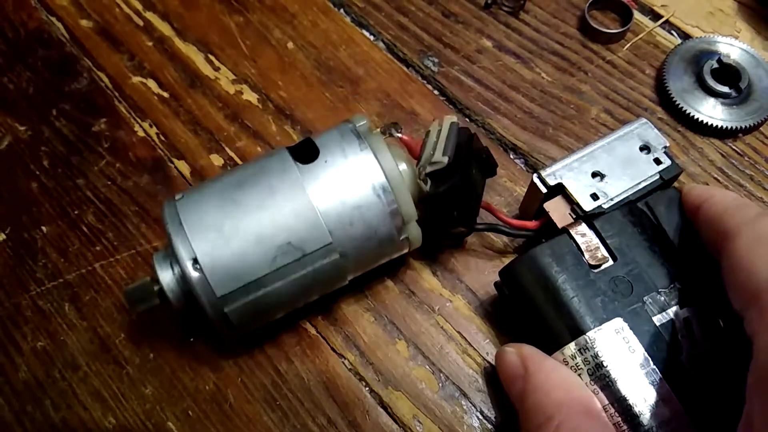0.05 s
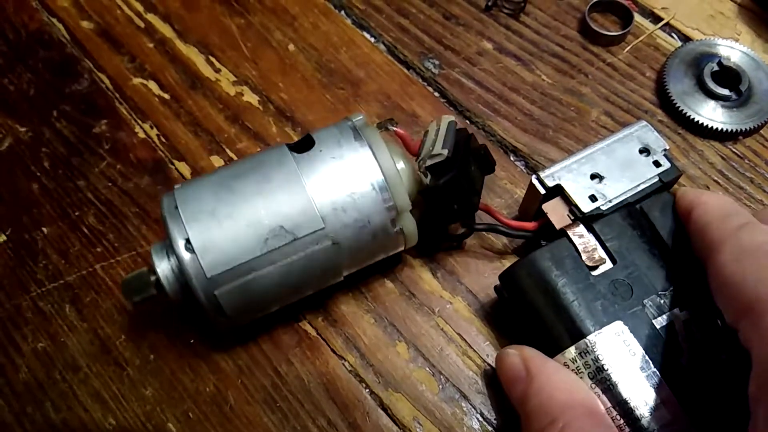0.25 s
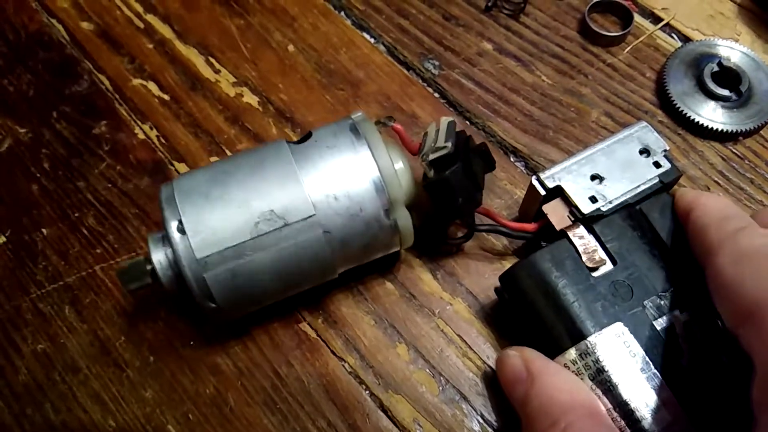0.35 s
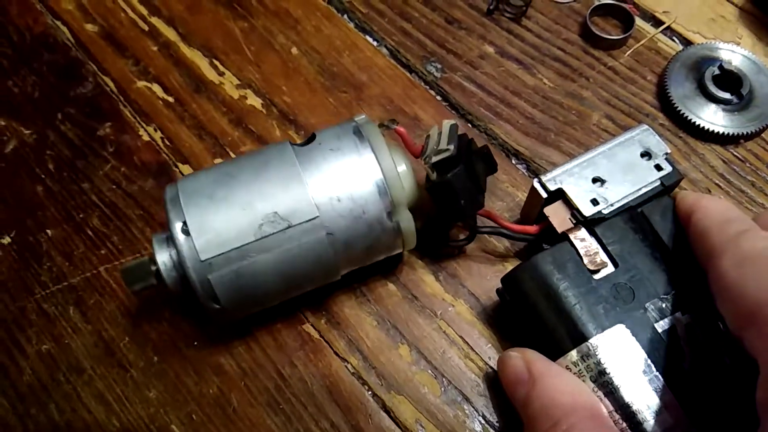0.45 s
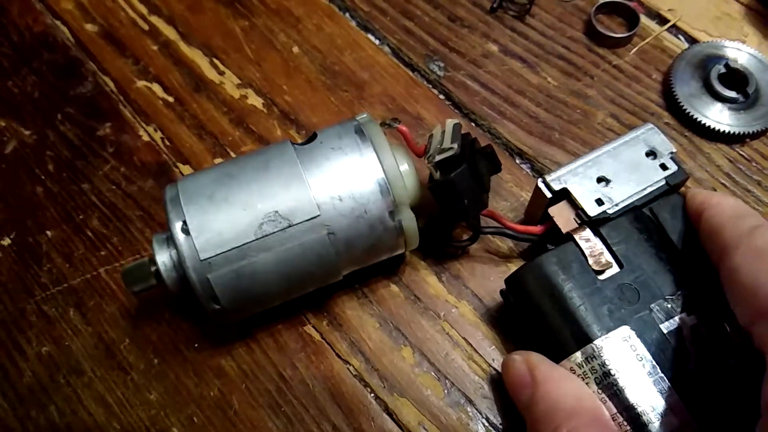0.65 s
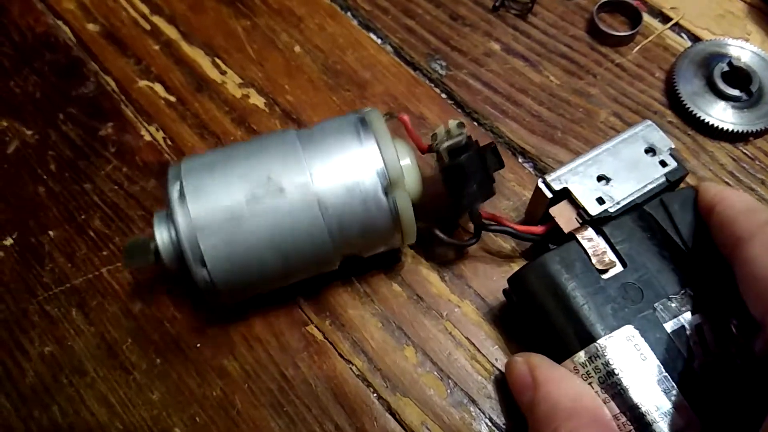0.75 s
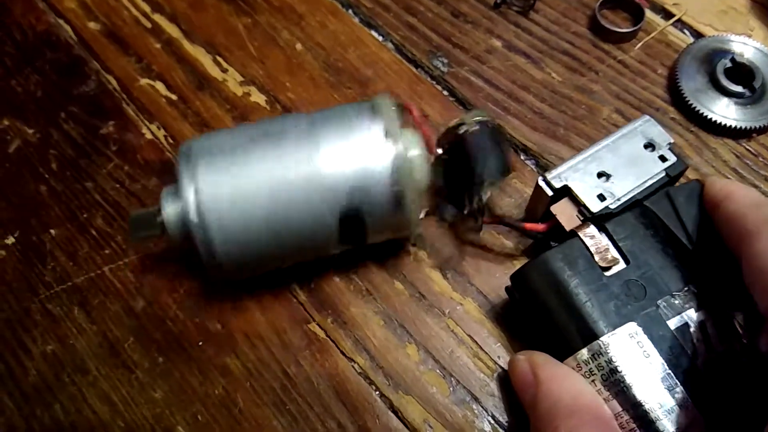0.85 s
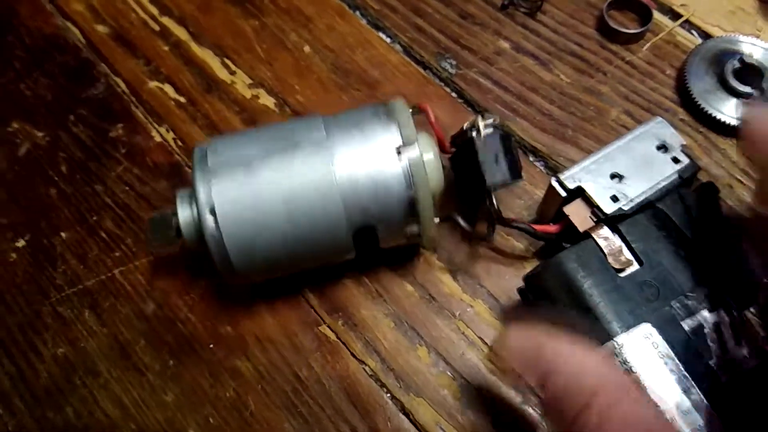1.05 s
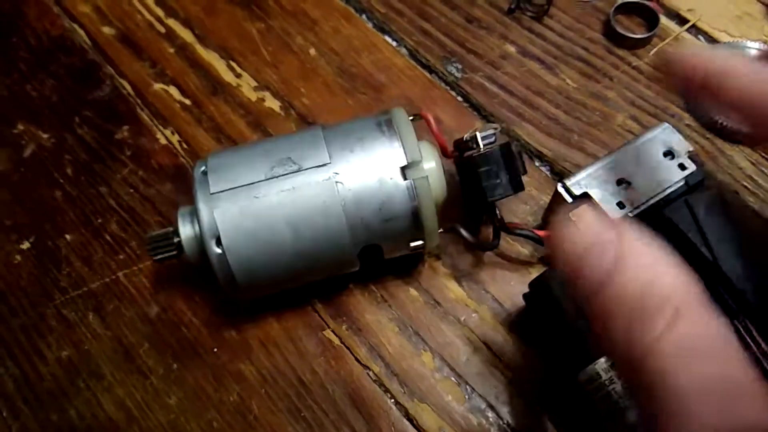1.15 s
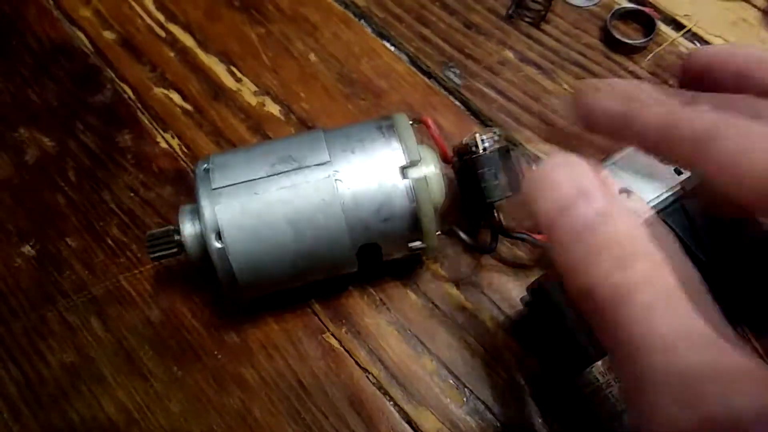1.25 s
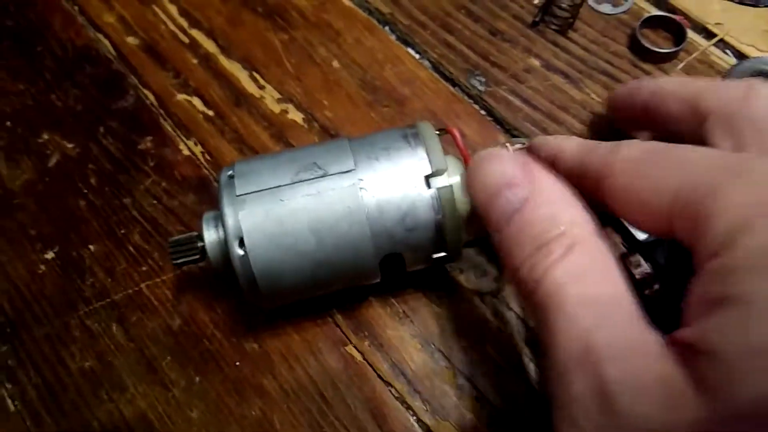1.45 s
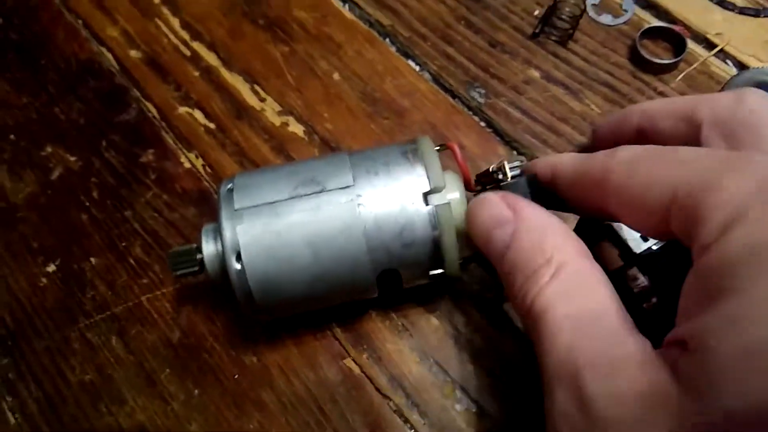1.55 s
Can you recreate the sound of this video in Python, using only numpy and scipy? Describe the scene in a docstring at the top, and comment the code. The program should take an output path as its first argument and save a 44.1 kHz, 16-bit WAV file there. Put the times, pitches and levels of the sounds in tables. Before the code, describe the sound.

A small bare electric motor whirs up, runs harshly for a moment, then brakes with wooden knocks

```python
"""Small room, close stereo microphone: a bare drill motor lies on a wooden workbench.
It speeds up as its trigger is squeezed with a metallic click, then is let go and brakes. Its unbalanced rotor
hums through the bench and its brushes scratch the same track on every turn, ringing the steel can; armature
slots add a whine. The shaft rasps in its bearing while speeding up and slowing. Decaying bench modes and can
noise make the knocks as the motor rocks on starting and stopping; a hand then shifts the switch.
Steady room noise lies behind."""
import sys
import numpy as np
from scipy import signal
from scipy.fft import rfft, irfft
from scipy.io import wavfile

SR = 44100
rng = np.random.default_rng(int(sys.argv[2]) if len(sys.argv) > 2 else 0)


def to_wav(s):
    """Save 16-bit WAV."""
    ch = np.atleast_2d(s).T  # columns
    pcm = np.round(np.clip(ch, -1, 1) * 32767)  # PCM
    wavfile.write(sys.argv[1], SR, pcm.astype(np.int16))


N = 70560  # length [samples]
T = np.arange(N) / SR  # time [s]

# shaft speed: (time [s], speed [turns per second])
SHAFT_SPEED = [(0, 58), (.1, 78.5), (.255, 96.5), (.306, 110), (.346, 122.5), (.392, 128), (.442, 132.5),
               (.496, 137), (.602, 143.5), (.705, 146.5), (.738, 143.5), (.766, 136), (.808, 123.5),
               (.842, 112.5), (.896, 97.5), (.93, 73.6), (1.0, 2.14)]
# hum at the reference speed, before the bench radiates it: (multiple of shaft rate, level [dB])
HUM_ORDERS = [(1, -30), (2, -44.5), (3, -43.5), (4, -52.5), (5, -58), (6, -51), (7, -56), (8, -56.5),
              (10, -59), (12, -56)]
# how well the bench radiates the hum: (frequency [Hz], gain [dB])
BENCH_RADIATION = [(105, -23.5), (145, -3), (200, -8.5), (255, -2.5), (290, 1.5), (380, -10.5), (500, -3.5),
                   (1000, -3), (1070, -13), (1160, 2.5), (1450, -3)]
# whine of the armature slots: (time [s], level [dB])
SLOT_WHINE = [(.25, -66.5), (.35, -44), (.42, -43), (.455, -55.5), (.6, -48), (.8, -46), (.92, -44),
              (1, -94)]
# strength of the brush scratch: (time [s], level [dB])
SCRATCH_LEVEL = [(0, -65.5), (.07, -60), (.09, -51.5), (.21, -38.5), (.32, -35), (.48, -34.5), (.6, -35.5),
                 (.9, -35), (.925, -56.5), (1.06, -82.5)]
# share of the scratch that repeats each turn: (frequency [Hz], level [dB])
REPEATING_SCRATCH = [(1200, -8), (3000, -3), (6000, 3), (14000, 0)]
# fresh friction noise at the brushes: (frequency [Hz], level [dB])
FRESH_FRICTION = [(1200, -1), (3000, -12), (7000, -10), (11000, -4)]
# commutator tones against the scratch: (multiple of shaft rate, level [dB], extra at chatter speed [dB])
COMMUTATOR_TONES = [(21, -22, -10), (22, -19, -5), (24, -18, 8), (25, -19, -2), (27, -21, 6), (30, -17, 8)]
# spectrum of the ringing steel can: (frequency [Hz], left level [dB], right level [dB])
CAN_RESPONSE = [(64, -60, -30), (133, 10, 9), (239, 5.5, -9), (546, -6, -7.5), (1240, -6, -5.5),
                (1480, -10.5, -8), (2520, -9.5, -12.5), (3210, 0.5, -0.5), (3710, 0.5, 1.5),
                (4430, -4, -5.5), (5340, -6.5, -9), (5930, -7.5, -5.5), (6480, -10, -6.5),
                (7180, -17.5, -20.5), (8220, -5, -13), (9160, -17, -21), (10900, -9, -12),
                (11940, -4, -5.5), (12560, -9, -9), (15100, -13, -12.5)]
# likeness of the can's sound at left and right: (frequency [Hz], correlation [-1 to 1])
CAN_LIKENESS = [(200, -0.91), (1200, 1), (2100, -0.85), (3100, 0.9), (3700, 0.63), (4700, -0.77),
                (5600, 0.19), (6500, -0.69), (7700, 0.17)]
# once-a-turn rasp of the shaft, strong while speeding up, fading at full speed, back while slowing:
# (time [s], level [dB])
RASP_LEVEL = [(.06, -66), (.22, -45), (.36, -44), (.45, -56), (.74, -58), (.82, -49), (.9, -50), (1.0, -85)]
# knocks on the bench, and a metallic trigger click at .083 s:
# (time [s], level [dB], contact hardness [Hz], metal rattle [dB], pitch of the bench's ring [ratio])
BENCH_KNOCKS_AND_CLICK = [(.023, -47.5, 740, 3.5, 0.86), (.083, -57.5, 1510, 19, 1.36),
                          (.223, -32, 900, -18, 0.84), (.231, -32, 790, -5, .8),
                          (.252, -32.5, 800, -2, 0.91), (.8, -35, 300, -10, 0.72),
                          (.854, -34, 500, 6, 0.93), (.893, -32, 2600, 11, 1.17),
                          (0.9164, -26, 740, -13, 1), (.922, -27, 456, -11, 1.016),
                          (0.9293, -14.5, 465, -20.5, 1), (.958, -35, 395, -1, 1),
                          (.996, -23.5, 800, -40, 1.05), (1.0193, -33.5, 595, -20, 1.02),
                          (1.089, -50, 960, -7, 0.89), (1.17, -40, 520, -10.5, 0.99),
                          (1.179, -43, 495, -21, 0.97), (1.197, -40.5, 645, -22, 1),
                          (1.205, -59, 900, 5, 0.95), (1.518, -56, 400, -27, 0.66)]
# bench modes before each knock's pitch ratio: (frequency [Hz], level [dB], T60 [s])
BENCH_MODES = [(197.8, -8.5, 0.11), (245.7, 3.5, 0.059), (338, -9, 0.084), (498, -14, 0.072),
               (611, -9.5, 0.055), (950, -12.5, 0.033), (1183, -11, 0.068), (1550, -6, 0.017)]
# dense wood resonances behind the modes: (frequency [Hz], level [dB])
WOOD_SPECTRUM = [(170, -21), (700, -7), (1500, -9.5), (2100, -15.5), (4000, -30)]
# relative spectrum of the quiet background: (frequency [Hz], density [dB per Hz])
FLOOR_SPECTRUM = [(30, 4), (150, 6.5), (1300, -4.5), (2200, -18.5), (3400, -14), (4800, -29.5),
                  (15000, -32)]

REFERENCE_HZ = 145  # shaft rate at which the hum and tones take their table levels
HUM_DB_PER_OCTAVE = 13.5  # rise with shaft speed
HUM_PAN_DB = 13  # at the shaft rate; divided by the order above it
HUM_WAVER, WHINE_WAVER, TONE_WAVER = 0.1, 0.049, .4  # relative; hum also times the root of its order
CHATTER_HZ, CHATTER_WIDTH_HZ = 135, 6  # shaft rate where the brushes chatter

JITTER_S, WEAR = 7e-6, .22  # chance in each bump's time, and in its relative height each turn
BAR_DEPTH = .55  # swing of brush pressure
SLOW_NOISE_DB = 14  # loss of the repeating clicks at half speed and below
CRACKLE_DB, CRACKLE_HZ = 6, 220  # crackle swing at half speed and below, and its rate limit
CAN_T60, CAN_RING_DB = .025, -7  # [s], ring energy against the direct sound

RASP_HZ, RASP_WIDTH_HZ, RASP_PAN_DB = 3430, 530, 4.5
RASP_SHARE, RASP_WANDER = .17, .05  # width and wander of the scrape [turns]
RASP_SCATTER_DB = 1.2

CONTACT_S, BENCH_DETUNE = .0007, .025  # onset of a blow, relative chance in each mode's pitch
BENCH_LOW_HZ, BENCH_PAN_DB = 165, 6
WOOD_DB, WOOD_T60 = -5.5, 0.052  # [dB], [s]
METAL_T60, RATTLE_HZ = 0.088, 3230  # decay [s], rattle's upper limit

ROOM_T60, ROOM_DB, ROOM_LOW_HZ = .11, -9, 320  # decay [s], level, bass cut
FLOOR_DB, FLOOR_ALIKE, FLOOR_PAN_DB = -63.5, 0.48, 1.5  # likeness of left and right is a correlation
LOW_CUT_HZ, EDGE_HZ = 98, 15550


def amp(db):
    """Decibels to gain."""
    return 10 ** (np.asarray(db) / 20)


def unit(x):
    """Scales to rms 1."""
    return x / np.sqrt(np.mean(x ** 2) + 1e-20)


def curve(points):
    """A control curve at every sample."""
    return np.interp(T, *np.transpose(points))


def read(points, hz):
    """A table read on a log-frequency axis."""
    f, value = np.transpose(points)
    return np.interp(np.log(hz + 1), np.log(f + 1), value)


def colour(x, points):
    """Filters x by a table of gains over frequency."""
    size = 2 * x.shape[-1]
    gain = amp(read(points, np.fft.rfftfreq(size, 1 / SR)))
    return irfft(rfft(x, size) * gain)[..., :size // 2]


def pan(db):
    """Left and right gains, left db above right, with a mean of 1."""
    gains = amp([[db / 2], [-db / 2]])
    return gains / gains.mean()


def drift(rate_hz):
    """Slow chance, rms 1: noise that fades above rate_hz."""
    fade = 1 + (np.fft.rfftfreq(N, 1 / SR) / rate_hz) ** 4
    return unit(irfft(rfft(rng.standard_normal(N)) / fade, N))


def correlate(a, b, alike):
    """A left and right pair of the given likeness, from two unrelated signals."""
    return np.array([a, alike * a + np.sqrt(1 - alike ** 2) * b])


def butter(hz, kind, order=2):
    """A Butterworth filter in second-order sections."""
    return signal.butter(order, hz, kind, fs=SR, output="sos")


def add(mix, s, sound):
    """Mixes a sound in at time s."""
    part = mix[round(s * SR):][:len(sound)]
    part += sound[:len(part)]


def motor():
    """Hum, whine, scratch and rasp of one motor, all locked to the turning of its shaft."""
    speed = curve(SHAFT_SPEED)
    turns = np.cumsum(speed) / SR
    return hum(speed, turns) + whine(turns) + scratch(speed, turns) + rasp(turns)


def shaft_tone(turns, order, waver):
    """A tone at a multiple of the shaft rate, wavering in strength and phase."""
    carrier = np.exp(2j * np.pi * (order * turns + rng.random()))
    wavering = 1 + waver * (drift(17.0) + 1j * drift(30))
    return np.sqrt(2) * np.real(carrier * wavering)


def hum(speed, turns):
    """The unbalanced rotor shakes the bench, which radiates each order according to its frequency."""
    total = np.zeros((2, N))
    for order, db in HUM_ORDERS:
        level = amp(db + read(BENCH_RADIATION, order * speed))
        tone = shaft_tone(turns, order, HUM_WAVER * np.sqrt(order))
        total += level * tone * pan(HUM_PAN_DB / order)
    return total * amp(HUM_DB_PER_OCTAVE * np.log2(speed / REFERENCE_HZ))


def whine(turns):
    """Nine armature slots pass on each turn and make a tone at nine times the shaft rate."""
    return amp(curve(SLOT_WHINE)) * shaft_tone(turns, 9, WHINE_WAVER)


def scratch(speed, turns):
    """Two brushes and the commutator tones drive the steel can."""
    drives = np.array([brush(speed, turns) + commutator(speed, turns), brush(speed, turns)])
    return unit(can(drives)) * amp(curve(SCRATCH_LEVEL))


def bars(angle, count=6):
    """Brush pressure rises and falls as the commutator bars pass, six to a turn."""
    return 1 + BAR_DEPTH * np.cos(2 * np.pi * count * angle)


def brush(speed, turns, count=110, oversample=4):
    """A brush meets the same bumps every turn over friction hiss; a slower shaft is noisier and more crackly."""
    angle = (np.arange(count) + rng.random(count)) / count
    height = rng.standard_normal(count) * bars(angle)
    laps = np.arange(SR // 256)[:, None]  # more than the shaft makes
    wear, jitter = rng.standard_normal((2, len(laps), count))
    when = np.interp(laps + angle, turns, T) + JITTER_S * jitter
    hit = (when > 0) & (laps + angle < turns[-1])

    # clicks are placed on a finer time grid, then brought down to the sample rate
    place = (when[hit] * SR * oversample).astype(int)
    strength = (height * (1 + WEAR * wear))[hit]
    fine = np.bincount(place, strength, 2 * N * oversample)[:N * oversample]
    clicks = colour(unit(signal.resample_poly(fine, 1, oversample)), REPEATING_SCRATCH)

    slow = np.clip(2 * (1 - speed / REFERENCE_HZ), 0, 1)
    friction = colour(unit(rng.standard_normal(N) * bars(turns)), FRESH_FRICTION)
    hiss = friction + slow * rng.standard_normal(N)
    crackle = amp(CRACKLE_DB * slow * np.tanh(drift(CRACKLE_HZ)))
    return (clicks * amp(-SLOW_NOISE_DB * slow ** 2) + hiss) * crackle


def commutator(speed, turns):
    """Commutator tones grow with the cube of speed and change balance where the brushes chatter."""
    chatter = np.exp(-((speed - CHATTER_HZ) / CHATTER_WIDTH_HZ) ** 2)
    total = np.zeros(N)
    for order, db, extra_db in COMMUTATOR_TONES:
        total += amp(db + extra_db * chatter) * shaft_tone(turns, order, TONE_WAVER)
    return total * (speed / REFERENCE_HZ) ** 3


def can(drives):
    """Two drives ring the can: decaying noise stands for its many close modes, radiated differently each side."""
    t = np.arange(SR // 40) / SR
    ring = unit(rng.standard_normal(len(t)) * amp(-60 * t / CAN_T60))
    ring = ring * amp(CAN_RING_DB) / np.sqrt(len(t))
    a, b = rfft(drives, 2 * N) * (1 + rfft(ring, 2 * N))
    alike = read(CAN_LIKENESS, np.fft.rfftfreq(2 * N, 1 / SR))
    left, right = irfft(correlate(a, b, alike))[:, :N]
    table = np.array(CAN_RESPONSE)
    return np.array([colour(left, table[:, [0, 1]]), colour(right, table[:, [0, 2]])])


def rasp(turns):
    """Once a turn the loose shaft scrapes its bearing, unevenly, and rings the can's main resonance."""
    angle = (turns + RASP_WANDER * drift(70)) % 1
    scatter = amp(RASP_SCATTER_DB * rng.standard_normal(int(turns[-1]) + 1))
    strength = scatter[turns.astype(int)]
    scrape = np.exp(-((angle - .5) / RASP_SHARE) ** 2)
    a, b = rng.standard_normal((2, N)) * strength * scrape
    band = butter([RASP_HZ - RASP_WIDTH_HZ / 2, RASP_HZ + RASP_WIDTH_HZ / 2], "bandpass")
    ringing = unit(signal.sosfilt(band, [a + b / 2, a - b / 2]))
    return ringing * amp(curve(RASP_LEVEL)) * pan(RASP_PAN_DB)


def bench_ring(t, hardness_hz, pitch):
    """A blow on wood: decaying modes over dense resonances, brighter the harder the contact."""
    ring = amp(WOOD_DB - 60 * t / WOOD_T60) * unit(colour(rng.standard_normal(len(t)), WOOD_SPECTRUM))
    for hz, db, t60 in BENCH_MODES:
        mode_hz = hz * pitch * (1 + BENCH_DETUNE * rng.standard_normal())
        ring += amp(db - 60 * t / t60) * np.sin(2 * np.pi * mode_hz * t)
    onset = np.minimum(t / CONTACT_S, 1)
    return signal.sosfilt(butter(hardness_hz, "low"), ring * onset)


def knocks_and_click():
    """Each blow rings the bench and rattles the can with decaying noise; the trigger click is mostly rattle."""
    t = np.arange(SR // 4) / SR
    wood, metal = np.zeros(N), np.zeros((2, N))
    for s, db, hardness_hz, rattle_db, pitch in BENCH_KNOCKS_AND_CLICK:
        add(wood, s, amp(db) * bench_ring(t, hardness_hz, pitch))
        for drive in metal:
            add(drive, s, amp(db + rattle_db - 60 * t / METAL_T60) * rng.standard_normal(len(t)))
    wood = signal.sosfilt(butter(BENCH_LOW_HZ, "high"), wood)
    rattle = signal.sosfilt(butter(RATTLE_HZ, "low"), can(metal))
    return wood * pan(BENCH_PAN_DB) + rattle


def room(x):
    """Reflections of the small room: a short tail of decaying noise after a 4 ms gap."""
    t = np.arange(SR // 2) / SR
    tail = rng.standard_normal((2, len(t))) * amp(-60 * t / ROOM_T60) * (t > .004)
    return signal.fftconvolve(x, tail / np.linalg.norm(tail[0]), axes=1)[:, :N]


def background():
    """Steady room noise: coloured noise, partly shared between left and right."""
    a, b = colour(rng.standard_normal((2, N)), FLOOR_SPECTRUM)
    return amp(FLOOR_DB) * unit(correlate(a, b, FLOOR_ALIKE)) * pan(FLOOR_PAN_DB)


def scene():
    """Motor, knocks and click close by, their reflections without bass, and the room noise."""
    near = motor() + knocks_and_click()
    reflections = room(signal.sosfilt(butter(ROOM_LOW_HZ, "high"), near))
    return near + amp(ROOM_DB) * reflections + background()


def record(dry):
    """The microphone's bass cut and the recorder's band limit."""
    thin = signal.sosfilt(butter(LOW_CUT_HZ, "high", order=4), dry)
    band_limit = signal.firwin(511, EDGE_HZ, window=("kaiser", 9), fs=SR)
    return signal.oaconvolve(thin, band_limit[None], "same")


dry = scene()
out = record(dry)
to_wav(out)
```